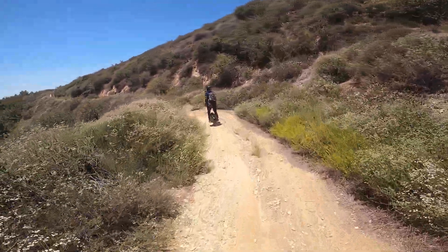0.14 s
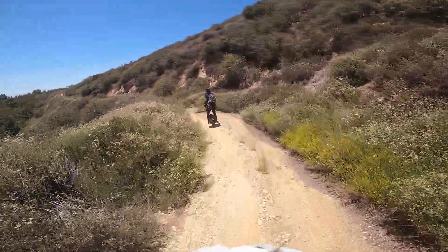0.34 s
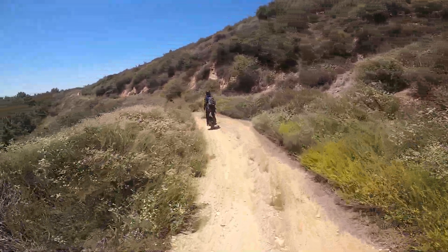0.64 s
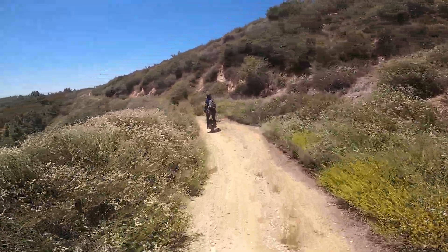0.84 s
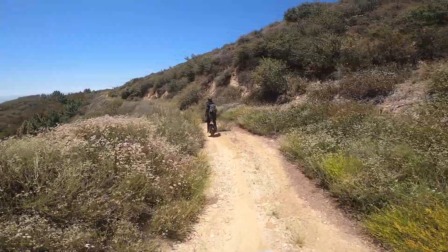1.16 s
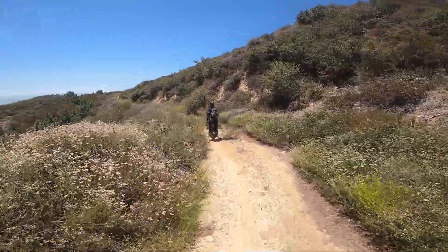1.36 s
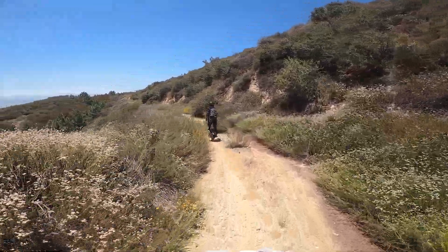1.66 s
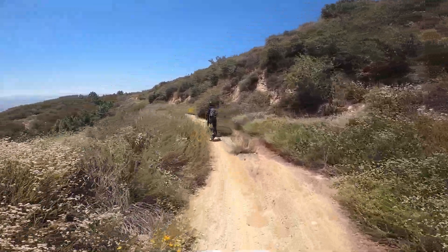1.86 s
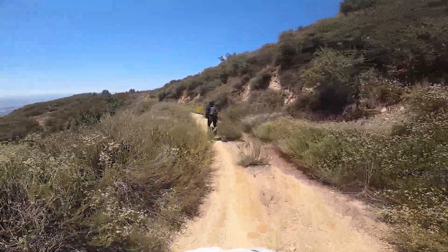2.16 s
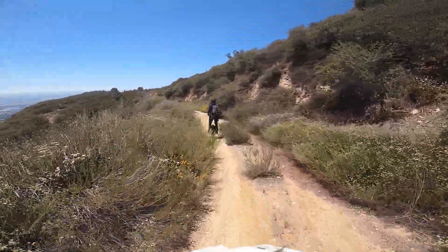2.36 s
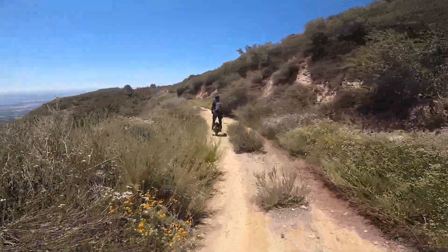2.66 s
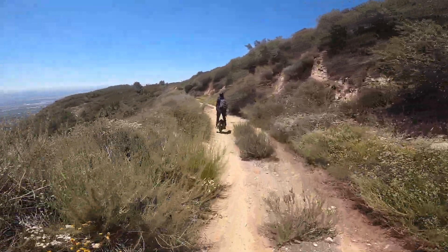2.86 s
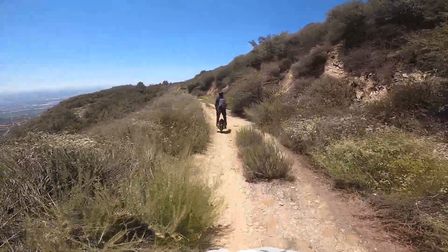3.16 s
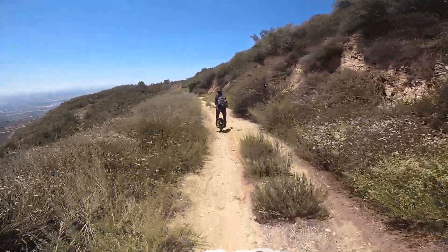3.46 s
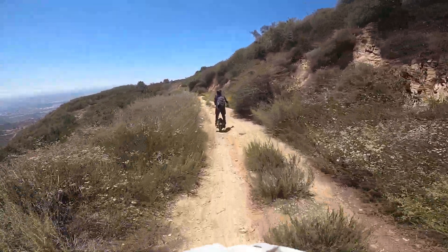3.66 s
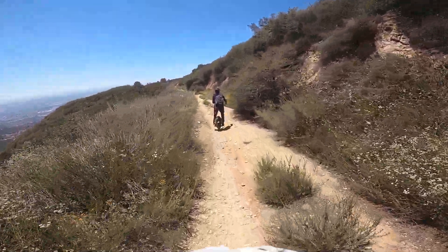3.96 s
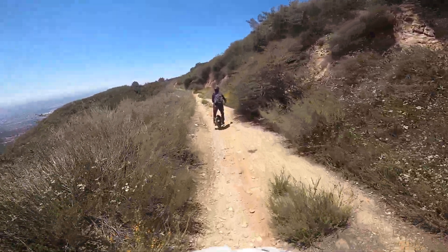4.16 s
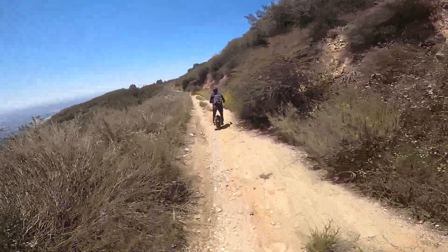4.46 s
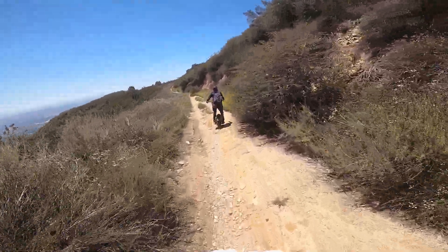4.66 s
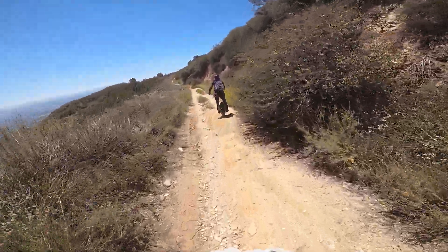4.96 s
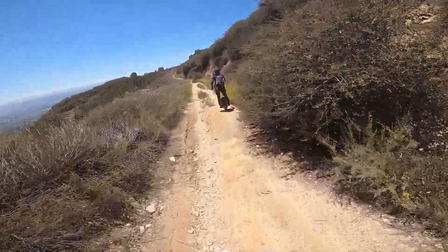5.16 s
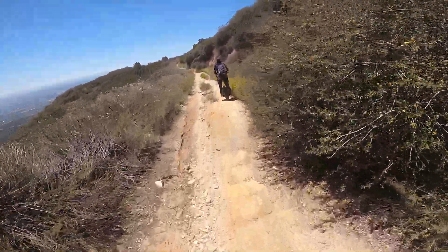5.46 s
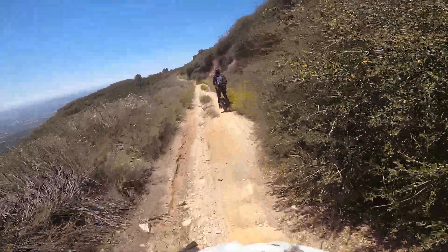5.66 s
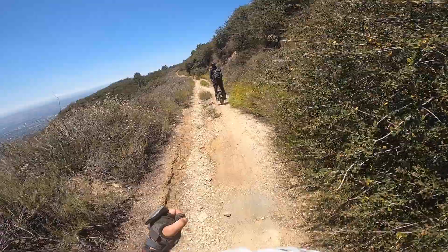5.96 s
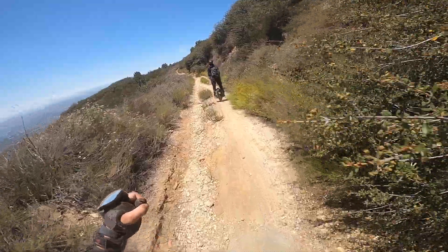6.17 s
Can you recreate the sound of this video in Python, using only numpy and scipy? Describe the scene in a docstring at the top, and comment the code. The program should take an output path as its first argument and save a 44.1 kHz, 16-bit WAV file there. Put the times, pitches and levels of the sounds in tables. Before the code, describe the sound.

A worn, shielded microphone rides along a dirt trail, close and slightly dull in the treble. From 0 to 1.6 s deep wind rumbles and fades over soft soil crunch, a few muffled knocks, thin grit ticks, airy hiss and a faint brief tone; a very weak steady motor whine lies underneath. At about 1.7 s gusts surge, and two sharp, briefly ringing plastic clacks hit at 1.9 and 2.0 s with thuds and strap scuffs. From 2.2 to 3.5 s wind buffets heavily, strongest near 3 s, with short skids and fewer knocks. From 3.6 s the tyre skips and crunches harder, grit ticks thicken, and clacks strike at 4.2 and 4.8 s. Dull knocks crowd together, loudest near 5 s. Two more hard clacks come at 5.6 and 5.7 s amid brisk strap rustle, then a weaker one at 6.2 s as crunch and wind settle.

```python
"""Gusts of wind swell and fade throughout, on the shielded microphone of a camera worn by a rider on a dirt trail.
Wind is shaped noise that heaves, buffets, flutters and hisses. Close by, a loose plastic part of the mount
clacks as a set of ringing modes, and duller knocks reach the microphone through the housing as filtered puffs.
The tyre crunches and scuffs loose soil and straps and clothing rustle, all as patchy noise with grains on top.
Grit ticks in short bands of noise, over two faint sine tones."""
import sys
import numpy as np
from scipy import signal
from scipy.fft import rfft, irfft, next_fast_len
from scipy.io import wavfile
from scipy.ndimage import uniform_filter1d, map_coordinates

SR = 44100
rng = np.random.default_rng(int(sys.argv[2]) if len(sys.argv) > 2 else 0)


def transcribe(signal):
    """Save signal, clipped to [-1, 1], as a 16-bit WAV file at the path in sys.argv[1]."""
    frames = np.atleast_2d(signal).T
    limited = np.clip(frames, -1, 1)
    pcm = np.round(limited * 32767).astype(np.int16)
    wavfile.write(sys.argv[1], SR, pcm)


N = 278271  # length in samples

# Gusts at the microphone: time_s, heave_db, buffet_db
GUSTS = [(0.0, -22.5, -40), (0.14, -33, -35.5), (0.3, -29, -34.5), (0.55, -30, -31), (0.75, -30, -35.5),
         (0.95, -34, -29.5), (1.2, -37.5, -37.5), (1.63, -40, -35), (1.66, -29.5, -22), (1.74, -20.5, -23),
         (1.83, -30.5, -27), (1.92, -19, -22.5), (2.2, -22, -21), (2.41, -27.5, -24.5), (2.7, -23.5, -26),
         (2.83, -30.5, -36), (2.87, -16.5, -26.5), (2.99, -19.5, -17), (3.06, -22, -21),
         (3.14, -23.5, -32.5), (3.24, -31, -37.5), (3.55, -24.5, -30.5), (3.77, -31, -33),
         (3.85, -27, -27.5), (4.0, -28.5, -34.5), (4.15, -32.5, -44), (4.35, -35, -34.5),
         (4.43, -31.5, -23), (4.62, -19, -28), (4.68, -32, -53), (4.74, -21, -21), (4.92, -31, -31.5),
         (5.26, -23.5, -24.5), (5.46, -30, -28), (5.64, -31, -33), (5.73, -23.5, -28.5), (5.78, -29, -36),
         (6.1, -30, -30.5), (6.31, -37, -37.5)]
# Quicker fluttering at the microphone port: time_s, level_db
FLUTTER_LEVEL = [(0.0, -45), (0.39, -43), (1.56, -42), (2.05, -35.5), (3.32, -43), (3.78, -40.5),
                 (4.29, -40.5), (4.59, -37.5), (6.31, -46.5)]
# Single puffs that flare the flutter: peak_s, level_db, length_s
FLUTTER_PUFFS = [(0.28, -41.5, 0.11), (0.77, -56, 0.029), (1.75, -28.5, 0.014), (1.88, -29.5, 0.023),
                 (2.09, -42, 0.022), (2.28, -36.5, 0.045), (2.5, -34, 0.024), (1.68, -42, 0.024),
                 (1.85, -39, .012), (2.96, -42, 0.03), (3.035, -40, 0.029), (3.43, -55, 0.017),
                 (4.22, -37, 0.016), (4.77, -39, 0.035), (5.01, -38, 0.032), (5.22, -24.5, 0.025),
                 (5.35, -34, 0.026), (5.54, -34, 0.014), (5.73, -47, 0.021), (5.93, -27, 0.014),
                 (6.21, -58, 0.012)]
# Hiss of the airstream: time_s, level_db
AIRSTREAM_LEVEL = [(0, -42.5), (.15, -48.5), (.8, -51.5), (1.7, -64), (3, -52.5), (4.5, -65), (5.5, -49.5),
                   (6.31, -49.5)]
# Relative noise spectra of heave, buffeting, flutter and hiss: frequency_hz, density_db (per Hz)
HEAVE_SPECTRUM = [(8, -11.5), (20, 3.5), (42, 3), (60, -3), (100, -39), (400, -120)]
BUFFET_SPECTRUM = [(30, -35.5), (55, 1), (80, 0.5), (130, -4), (190, -15), (300, -45.5), (1000, -120)]
FLUTTER_SPECTRUM = [(60, -48), (140, -6.5), (200, -2), (300, -7.5), (400, -19.5), (1000, -63.5)]
HISS_SPECTRUM = [(300, -6.5), (900, -1.5), (2500, -4), (4200, -5.5), (7000, -24.5), (15000, -57)]


def wind():
    """Large eddies heave and buffet the diaphragm, small ones flutter, and the airstream hisses, carrying sand."""
    heave_db, buffet_db = curves(GUSTS)
    flutter_db, = curves(FLUTTER_LEVEL)
    hiss_db, = curves(AIRSTREAM_LEVEL)

    heave_noise = coloured(rng.standard_normal(N), HEAVE_SPECTRUM)
    heave = amp(heave_db) * unit(amp(2.73 * wobble(4.01)) * heave_noise)

    buffet_noise = coloured(patchy(0.62), BUFFET_SPECTRUM)
    buffet = amp(buffet_db) * unit(amp(1.24 * wobble(13)) * buffet_noise)

    flutter_noise = coloured(patchy(1.4), FLUTTER_SPECTRUM)
    flutter_gain = amp(flutter_db) + swells(FLUTTER_PUFFS)
    flutter = flutter_gain * unit(amp(1.6 * wobble(25)) * flutter_noise)

    sand = grains(rate=150, spread_db=1.5, life=.003)
    hiss = amp(hiss_db) * coloured(patchy(2.1) + 1.1 * sand, HISS_SPECTRUM)
    return heave + buffet + flutter + hiss


CRACK_DB, CRACK_T60_S = -2, .009  # gritty crack of the contact: level before its filter, decay by 60 dB
DULL_DB = 4  # extra loss of the modes over 3 kHz in the softer rebound
REBOUND_S = .0042  # delay of the rebound
# Clacks of the loose part: start_s, level_db, then relative to it body_db (modes under 1.5 kHz),
# rebound_db and slide_db; slide_s (time constant, at least 3 ms), treble_db (modes over 3.6 kHz, crack)
CLACK_EVENTS = [(1.882, -11, 1, -15, -20, 0.0065, -2), (1.97, -10.5, 3.5, -17, -8, 0.0067, 2.5),
                (4.201, -11.5, 1.5, -10.5, -22, 0.012, -4), (4.759, -11.5, 1, -17, -23, 0.031, -1),
                (5.562, -10.5, 4.5, -11, -5, 0.0032, 2), (5.724, -10.5, 4.5, -12.5, -5, 0.0026, 2),
                (5.792, -21.5, 4, -12, -22, 0.017, -2), (6.203, -17, 3, -6.5, -33, 0.041, -3)]
# Ringing modes of the part: pitch_hz, level_db (relative), t60_s
PART_MODES = [(249, -8, 0.031), (578, -5.5, 0.047), (715, -15, 0.075), (924, -2.5, 0.017),
              (1154, -18.5, 0.049), (1447, -13.5, 0.022), (2122, 7.5, 0.013), (2020, -19, 0.005),
              (2266, -9, 0.031), (2610, -6, 0.022), (3194, -2.5, 0.016), (4360, -12, 0.0064),
              (4540, -4.5, 0.0072), (5000, -17, 0.0077), (5360, -7, 0.0067), (6370, -17, 0.008),
              (8660, -14.5, 0.0073)]


def clacks():
    """The part slides with a swelling scrape, strikes, rings briefly and rebounds a few ms later."""
    rings, cracks, slides = np.zeros((3, N + SR))
    t = np.arange(SR // 10) / SR
    onset = (1 - np.exp(-t / .0006)) ** 2
    hz, level_db, t60 = np.transpose(PART_MODES)[:, :, None]

    for s, db, body_db, rebound_db, slide_db, slide_s, treble_db in CLACK_EVENTS:
        start = round(s * SR)
        softer_db = rebound_db - DULL_DB * (hz > 3000)
        for delay, hit_db in ((0, 0), (REBOUND_S, softer_db)):
            at = start + round(delay * SR)
            # each hit excites the modes a little differently
            scatter = rng.standard_normal((2, *hz.shape))
            detune = 1 + .008 * scatter[1]
            shift_db = 1.5 * scatter[0]
            tone_db = (hz < 1500) * body_db + (hz > 3600) * treble_db
            gain = amp(level_db + shift_db + hit_db + tone_db - 60 * t / t60)
            ring = np.sum(gain * np.sin(2 * np.pi * hz * detune * t), axis=0)
            rings[at:][:len(t)] += amp(db) * ring * onset

            crack_db = db + np.mean(hit_db) + treble_db + CRACK_DB
            cracks[at:][:len(t)] += amp(crack_db - 60 * t / CRACK_T60_S) * onset
        # reversed time: the slide grows up to the strike
        slides[start - len(t):start] += amp(db + slide_db) * np.exp(-t[::-1] / max(slide_s, .003))

    def crack_colour(f):
        """Three resonances of the gritty contact."""
        return (resonance(f, 4500, 2030) - 0.65 * resonance(f, 6050, 1400)
                + 0.73 * resonance(f, 2900, 1120))

    def slide_colour(f):
        """Two resonances of the sliding scrape."""
        return resonance(f, 2500, 1300) - .5 * resonance(f, 5700, 2000)

    grit = filtered(cracks[:N] * rng.standard_normal(N), crack_colour)
    rub = filtered(slides[:N] * rng.standard_normal(N), slide_colour)
    return rings[:N] + grit + rub


UPPER_HZ = 2050  # upper resonance of the housing
# Dull knocks: start_s, peak_db, centre_hz, upper_db (upper resonance, relative), t60_s (at least 8 ms)
KNOCK_EVENTS = [(0.025, -24.5, 780, -5, 0.15), (0.135, -32, 900, -15, 0.05), (0.599, -34.5, 690, -11, 0.05),
                (0.722, -31, 610, -25, 0.13), (0.779, -25, 486, -21, 0.071), (0.97, -30.5, 589, -13, 0.092),
                (1.281, -27.5, 407, -19, 0.044), (1.345, -32.5, 420, -22, 0.057),
                (1.43, -32, 1050, -15, .04), (1.858, -23, 650, -17, 0.11), (1.895, -25, 460, -30, 0.13),
                (1.985, -21, 474, -30, .12), (2.493, -23, 595, -7, 0.047), (3.28, -27, 450, -17, 0.025),
                (2.047, -24, 450, -18, .05), (2.056, -18.5, 676, -17, 0.058), (3.707, -33, 414, -9, 0.077),
                (3.831, -28, 450, -16, 0.08), (3.956, -20.5, 910, -22, 0.017),
                (4.013, -23.5, 527, -14, 0.13), (4.052, -22.5, 1180, -32, 0.046),
                (4.18, -20, 670, -19, 0.13), (4.274, -25, 1070, -30, 0.32), (4.413, -21, 434, -35, 0.076),
                (4.478, -19.5, 407, -22, 0.05), (4.548, -33, 594, -6, .04), (4.66, -21, 694, -22, 0.094),
                (4.692, -20, 534, -22, 0.077), (4.83, -21.5, 440, -29, 0.071),
                (4.885, -28, 501, -12, 0.075), (4.976, -19, 714, -12, 0.059),
                (4.981, -12.5, 532, -24, 0.034), (5.053, -19, 720, -20, 0.099),
                (5.069, -26, 513, -2, 0.036), (5.105, -29, 600, -20, 0.059),
                (5.143, -22.5, 635, -14, 0.056), (5.175, -24, 600, -17, 0.039),
                (5.243, -20.5, 406, -42, 0.092), (5.326, -26.5, 990, -29, 0.059),
                (5.345, -17.5, 447, -33, 0.043), (5.406, -17.5, 704, -24, 0.049),
                (5.548, -19.5, 637, -19, 0.24), (5.708, -19.5, 702, -22, 0.13),
                (5.862, -29, 547, -3, 0.052), (6.02, -25.5, 710, -13, 0.075)]


def knocks():
    """A soft contact: a dying noise puff through a broad low resonance and a weaker upper one."""
    out = np.zeros(N + SR)
    t = np.arange(8192) / SR
    f = np.fft.rfftfreq(len(t), 1 / SR)
    onset = 1 - np.exp(-t / 0.00039)
    for s, db, centre_hz, upper_db, t60 in KNOCK_EVENTS:
        puff = rng.standard_normal(len(t)) * amp(-60 * t / max(t60, .008)) * onset
        low = resonance(f, centre_hz, 1.17 * centre_hz)
        upper = resonance(f, UPPER_HZ, 1300)
        colour = low ** 3 + amp(upper_db) * upper ** 3  # cubed for steep skirts
        knock = irfft(rfft(puff) * colour, len(t))
        out[round(s * SR):][:len(t)] += amp(db) * knock / np.abs(knock).max()
    return out[:N]


# Rolling crunch: time_s, level_db
TREAD_LEVEL = [(0.0, -38), (0.12, -44.5), (1.05, -46.5), (1.3, -42.5), (1.76, -48), (1.9, -37),
               (2.15, -36.5), (2.33, -36.5), (2.5, -37), (2.65, -40), (2.9, -44), (3.22, -38.5),
               (3.33, -36), (3.45, -36), (3.55, -40), (3.72, -36), (3.92, -37), (4.03, -37.5), (4.25, -37),
               (4.33, -34), (4.56, -35.5), (4.75, -34), (4.86, -33.5), (4.97, -32), (5.16, -34),
               (5.27, -34), (5.4, -40), (5.75, -44.5), (6.1, -44.5), (6.22, -38.5), (6.31, -41.5)]
# Soil noise through the housing, which rings a little near 440 and 660 Hz:
# frequency_hz, density_db (per Hz, relative)
CRUNCH_SPECTRUM = [(150, -31), (340, -0.5), (440, 6.5), (540, -2.5), (660, 1.5), (820, -4.5), (1100, -2.5),
                   (1800, -11), (3000, -27), (6000, -61.5), (12000, -120)]


def tyre():
    """Soil crumbles under the tread: a rough bed of noise with crumbs on top."""
    level_db, = curves(TREAD_LEVEL)
    crumbs = grains(rate=300, spread_db=1.4, life=.003)
    bed = amp(0.8 * wobble(25)) * patchy(2.2)
    drift_db = .8 * wobble(12)
    gain = amp(level_db + airborne_db() + drift_db)
    return gain * coloured(bed + 1.06 * crumbs, CRUNCH_SPECTRUM)


# The wheel skips over a bump: landing_s, hop_s (scale of the dip's timing), drop_db (negative is a rise)
WHEEL_HOPS = [(1.85, 0.048, 5), (2.05, 0.051, 3.5), (2.392, 0.025, 5.5), (2.548, 0.013, 3),
              (3.61, 0.021, 1.5), (3.802, 0.047, 6.5), (4.17, 0.058, 7), (4.411, 0.025, 11),
              (4.655, 0.064, 5.5), (4.96, 0.042, 8.5), (5.05, 0.04, 8.5), (5.248, 0.021, 15),
              (5.4, 0.026, 4), (5.545, 0.032, 5), (5.7, 0.053, -0.5)]


def airborne_db():
    """Level change while the wheel is off the ground: a fade, a hold, and a return in the 8 ms before landing."""
    t = np.arange(N) / SR
    total_drop_db = 0
    for s, hop_s, drop_db in WHEEL_HOPS:
        corners = [s - 1.46 * hop_s, s - 1.07 * hop_s, s - .008, s]
        total_drop_db = total_drop_db + np.interp(t, corners, [0, drop_db, drop_db, 0])
    return -total_drop_db


SKID_WIDTH = 0.62  # width of each resonance over its centre
# The tyre skids and scuffs the soil: peak_s, level_db, length_s, centre_hz
SKID_EVENTS = [(2.187, -57, 0.042, 1000), (2.487, -38, 0.017, 1030), (3.37, -39.5, 0.053, 760),
               (3.39, -67, 0.073, 1700), (3.482, -47, .025, 990), (3.56, -37, 0.016, 1220),
               (3.705, -36.5, 0.016, 1000), (4.015, -37.5, 0.03, 1170), (4.32, -38.5, 0.088, 1210),
               (4.336, -41, .03, 664), (5.17, -49, 0.035, 1210), (2.314, -42, 0.03, 1700),
               (2.454, -38, .012, 1200), (2.561, -36.5, 0.014, 800), (5.635, -36, .02, 1900),
               (5.66, -45, .01, 1200), (5.81, -43, .015, 2170), (5.665, -44, 0.013, 2800),
               (1.263, -50, 0.079, 2200), (3.358, -46.5, 0.089, 1370), (4.553, -41, 0.013, 1500),
               (5.285, -45, 0.018, 1280)]


def skids():
    """Dense scuffing noise, each skid in its own broad band."""
    grit = grains(rate=400, spread_db=1.5, life=.003)
    noise = patchy(1.3) + 1.07 * grit
    out = np.zeros(N)
    for s, db, length, centre_hz in SKID_EVENTS:
        band = filtered(noise, lambda f: resonance(f, centre_hz, SKID_WIDTH * centre_hz) ** 2)
        out += swells([(s, db, length)]) * unit(band)
    return out


CLOTH_HOP = 0.22  # share of a hop's drop that the cloth follows
# Steady rubbing of straps and clothing: time_s, level_db
CLOTH_LEVEL = [(0.0, -49), (0.1, -53), (0.5, -53.5), (1.2, -53), (1.92, -53.5), (2.05, -49.5), (2.39, -48),
               (2.93, -53.5), (3.27, -50.5), (3.78, -49.5), (4.02, -51.5), (4.46, -46), (5.39, -49.5),
               (5.64, -43), (5.85, -52), (6.31, -47)]
# Separate strokes of the straps: peak_s, level_db, length_s
STRAP_STROKES = [(0.03, -59, 0.027), (1.47, -45.5, 0.014), (1.88, -39, 0.013), (1.955, -39.5, 0.032),
                 (2.07, -48, 0.011), (2.44, -44, 0.011), (2.99, -67, 0.018), (3.55, -47, 0.017),
                 (3.64, -38.5, 0.0066), (3.7, -48, 0.095), (3.95, -49.5, 0.057), (4.02, -49, 0.015),
                 (4.095, -49, 0.011), (4.19, -47, 0.013), (4.28, -41, 0.034), (5.07, -58, 0.027),
                 (5.5, -39.5, 0.013), (5.56, -36, 0.016), (5.61, -56, .02), (5.66, -33, 0.013),
                 (5.72, -36.5, 0.019), (5.82, -43, 0.046), (6.01, -42, 0.016), (6.28, -41, 0.017)]
# Cloth noise: frequency_hz, density_db (per Hz, relative)
CLOTH_SPECTRUM = [(500, -47), (1200, -2.5), (2500, 1), (4500, -7.5), (6600, -15.5), (9000, -12),
                  (15000, -28)]


def rustle():
    """Straps and cloth rub all the time and slide in short, denser strokes."""
    level_db, = curves(CLOTH_LEVEL)
    catches = grains(rate=220, spread_db=1.8, life=.004)
    bed = amp(0.57 * wobble(33)) * patchy(0.97)
    drift_db = 1.5 * wobble(12)
    gain = amp(level_db + CLOTH_HOP * airborne_db() + drift_db)
    steady = gain * coloured(bed + 0.9 * catches, CLOTH_SPECTRUM)

    grit = grains(rate=600, spread_db=1.5, life=.002)
    strokes = swells(STRAP_STROKES) * coloured(patchy(0.7) + 0.72 * grit, CLOTH_SPECTRUM)
    return steady + strokes


# Thin ticks of flying grit: start_s, peak_db, centre_hz, t60_s (at least 4 ms),
# width (over centre, no unit, at least 0.1)
GRIT_TICKS = [(0.043, -34, 3500, .006, 1.1), (0.069, -41, 3800, .006, 1.1), (.183, -44, 5000, .008, 1),
              (.38, -35, 3260, 0.011, 0.37), (0.592, -36, 3700, .005, 0.57), (0.611, -40, 4500, .01, 0.63),
              (0.705, -38.5, 5500, .01, 1), (1.0965, -38, 3260, .009, .8), (1.4548, -46, 3520, .009, .8),
              (1.72, -35.5, 1020, 0.036, 0.17), (2.2, -30, 1800, 0.0087, 0.41),
              (2.597, -25.5, 1480, 0.011, 0.78), (2.979, -37, 4500, .008, .8),
              (2.9963, -28, 3900, 0.0077, 0.79), (3.072, -29, 960, 0.044, 0.43), (3.279, -33, 2200, .01, 1),
              (3.543, -31, 3430, 0.014, .5), (3.574, -33, 4000, 0.017, 0.3), (3.641, -33, 3800, .009, 0.97),
              (3.644, -29, 1100, 0.027, .3), (3.699, -32, 2500, .02, .4), (3.838, -29, 1400, 0.014, 0.45),
              (3.946, -33, 6660, 0.026, 0.45), (3.955, -32, 3500, .008, 1.4),
              (4.012, -27, 1480, 0.039, 0.2), (4.02, -28, 1100, 0.028, .24), (4.37, -33, 2800, 0.011, 0.31),
              (4.478, -25, 1300, 0.013, 0.4), (4.523, -30, 1500, .01, 0.54), (4.661, -34, 2350, .05, .15),
              (4.737, -38, 1000, 0.011, .4), (4.976, -29, 2320, 0.051, 0.11),
              (5.008, -25, 1400, .015, 0.44), (5.055, -31, 2340, .02, .15),
              (5.0708, -24, 3800, 0.007, 0.98), (5.337, -41, 4400, .012, .3),
              (5.406, -25.5, 2510, 0.062, 0.17), (5.436, -33, 3000, 0.016, 0.52),
              (5.605, -29, 2700, .03, .3), (5.7494, -42, 2500, .012, 1)]


def ticks():
    """Grit strikes the housing: a short dying puff of noise in one band."""
    out = np.zeros(N + SR)
    t = np.arange(2048) / SR
    f = np.fft.rfftfreq(len(t), 1 / SR)
    for s, db, centre_hz, t60, width in GRIT_TICKS:
        puff = rng.standard_normal(len(t)) * amp(-60 * t / max(t60, .004))
        band = resonance(f, centre_hz, max(width, .1) * centre_hz) ** 2
        tick = irfft(rfft(puff) * band, len(t))
        out[round(s * SR):][:len(t)] += amp(db) * tick / np.abs(tick).max()
    return out[:N]


MOTOR_HZ, MOTOR_DB = 2015, -65  # faint tone of the motor, steady in pitch
# A faint brief tone: time_s, pitch_hz, level_db
LOW_TONE = [(.1, 659, -82), (.2, 662, -47), (.4, 645, -54), (.45, 660, -62), (.6, 697, -51), (.7, 682, -74),
            (1.5, 660, -68), (1.6, 660, -47), (1.72, 660, -84)]


def whine():
    """A weak, blurred low sine that comes and goes, and a thin one of fixed pitch and wavering level."""
    hz, db = curves(LOW_TONE)
    waver_db = 3 * wobble(25)
    waver_hz = 10 * wobble(30)
    low = amp(db + waver_db) * np.sin(2 * np.pi * np.cumsum(hz + waver_hz) / SR)
    motor_gain = amp(MOTOR_DB + 3.9 * wobble(2.7))
    motor = motor_gain * np.sin(2 * np.pi * MOTOR_HZ * np.arange(N) / SR)
    return low + motor


def amp(db):
    """dB to gain."""
    return 10 ** (np.asarray(db) / 20)


def unit(x):
    """Scaled to rms 1."""
    return x / np.sqrt(np.mean(x ** 2) + 1e-20)


def curves(rows):
    """One value per sample for each column after the time."""
    s, *cols = np.transpose(rows)
    return [np.interp(np.arange(N) / SR, s, c) for c in cols]


def wobble(rate):
    """A smooth random curve, rate knots a second (at most 200)."""
    knots = rng.standard_normal(int(N * 200 / SR) + 4)
    return map_coordinates(knots, [np.arange(N) * min(rate, 200) / SR])


def filtered(x, response):
    """x times a response of frequency."""
    m = next_fast_len(N + 8192)  # padded against wrap-round of the tail
    return irfft(rfft(x, m) * response(np.fft.rfftfreq(m, 1 / SR)), m)[..., :N]


def along(points, hz):
    """Gain of (Hz, dB) points on a log axis."""
    f, db = np.transpose(points)
    return amp(np.interp(np.log(hz + 1), np.log(f + 1), db))


def coloured(x, points):
    """x shaped by a spectrum, rms 1."""
    return unit(filtered(x, lambda hz: along(points, hz)))


def resonance(f, hz, width_hz):
    """One damped resonance, gain 1 at its centre."""
    return 1j * f * width_hz / (hz * hz - f * f + 1j * f * width_hz)


def patchy(depth_db):
    """Noise with patches of random gain in time and frequency."""
    z = signal.stft(rng.standard_normal(N), nperseg=256)[2]
    field = uniform_filter1d(rng.standard_normal(z.shape), size=5, axis=0)  # across frequency
    field = uniform_filter1d(field, size=8, axis=1)  # across time
    return signal.istft(z * amp(depth_db * unit(field)), nperseg=256)[1][:N]


def grains(rate, spread_db, life):
    """Noise gated by random bursts of mildly varying size, rate a second, each decaying over life seconds."""
    when, size = rng.random((2, N))
    starts = (when < rate / SR) * amp(-spread_db * np.log(size + 1e-9))
    shape = np.exp(-np.arange(SR // 20) / SR / life)
    return unit(signal.fftconvolve(starts, shape)[:N] * rng.standard_normal(N))


STOP = 0.95  # a swell ends faster than it grows: fall time over rise time


def swells(rows):
    """Gain of bell-shaped swells, one for each (peak_s, level_db, length_s of at least 5 ms)."""
    t = np.arange(N) / SR
    total = np.zeros(N)
    for s, db, length in rows:
        side_s = max(length, .005) * np.where(t > s, STOP, 1)
        total += amp(db) * np.exp(-((t - s) / side_s) ** 2)
    return total


def scene():
    """All sources at one microphone."""
    return (wind() + clacks() + knocks() + tyre() + skids() + rustle() + ticks() + whine())[None]


TOP_HZ = 15100  # band limit
# Response of the shielded microphone port: frequency_hz, gain_db
PORT_RESPONSE = [(20, 0.5), (5000, -3.5), (6600, -3), (7600, -9.5), (8800, -10.5), (11500, -16),
                 (13500, -22.5), (15000, -62)]


def record(dry):
    """The shielded microphone port dulls the treble; nothing is kept above the band limit."""
    return filtered(dry, lambda hz: along(PORT_RESPONSE, hz) * (hz < TOP_HZ))


dry = scene()
out = record(dry)
transcribe(out)
```